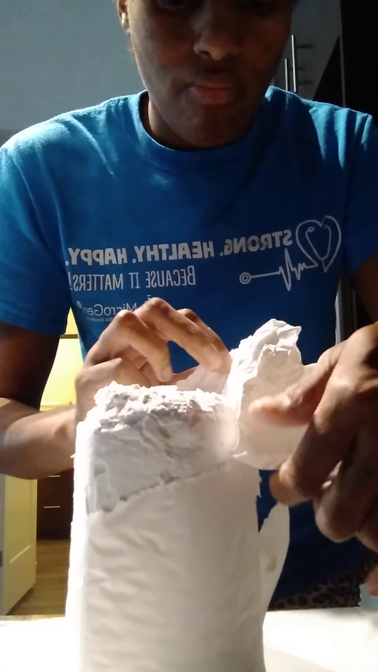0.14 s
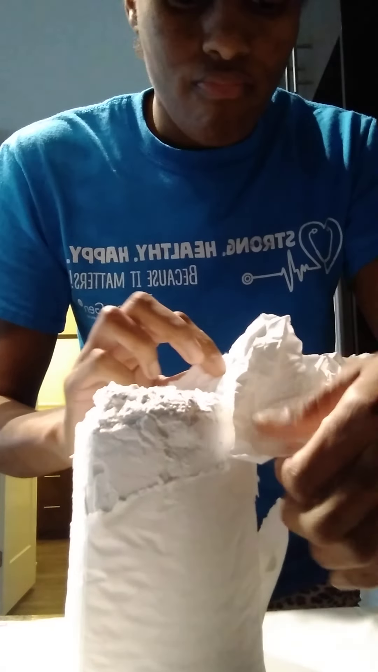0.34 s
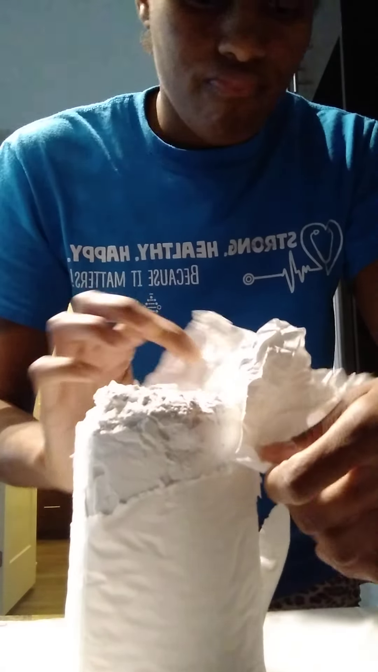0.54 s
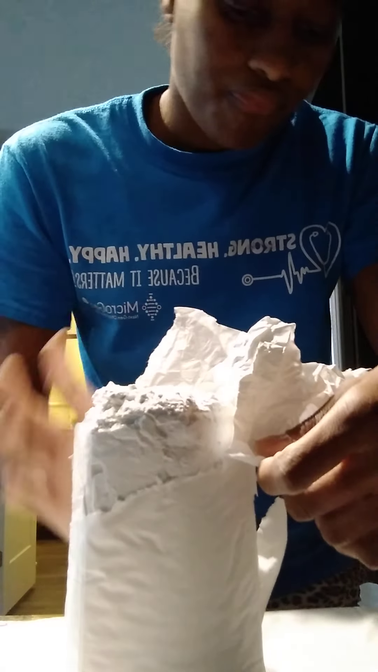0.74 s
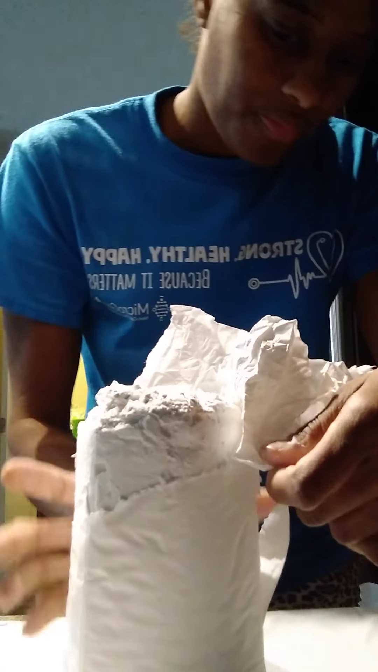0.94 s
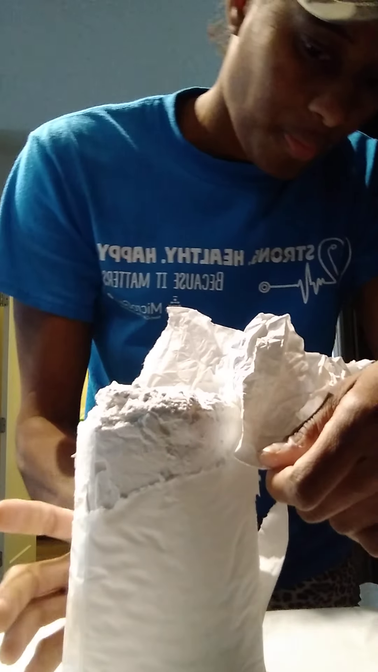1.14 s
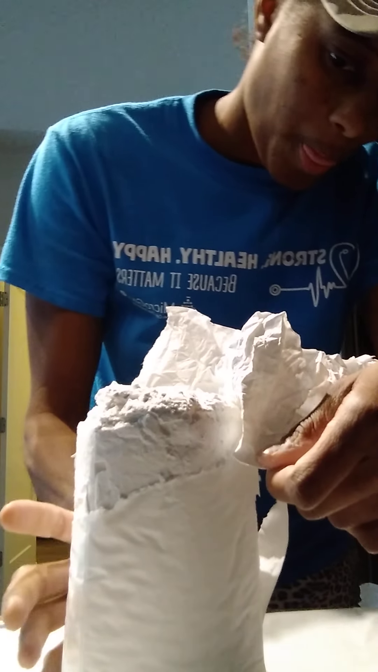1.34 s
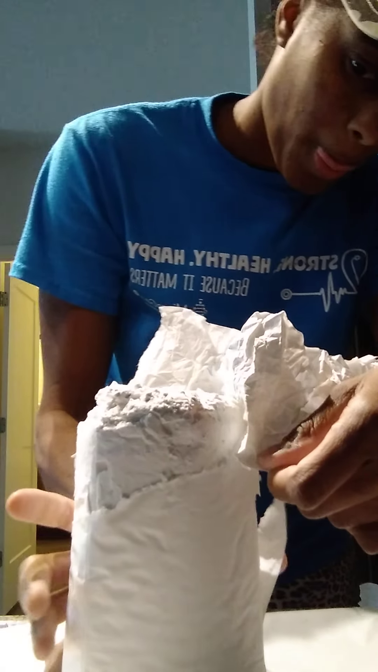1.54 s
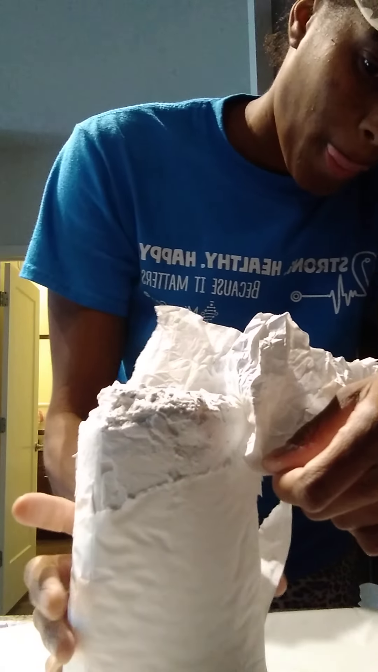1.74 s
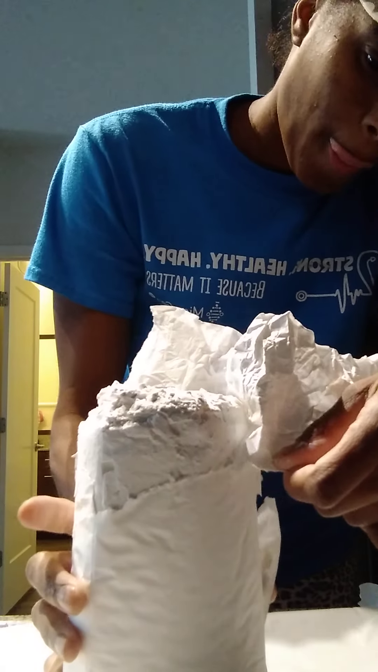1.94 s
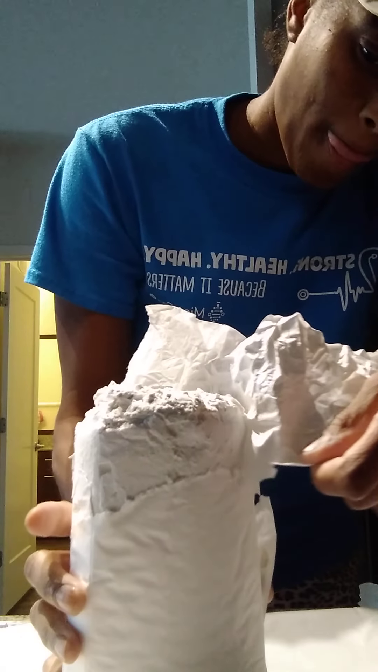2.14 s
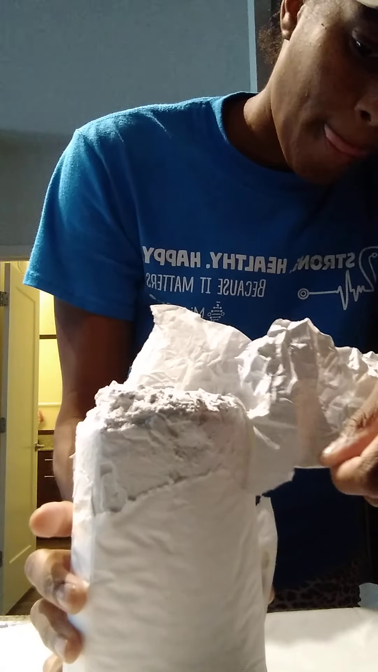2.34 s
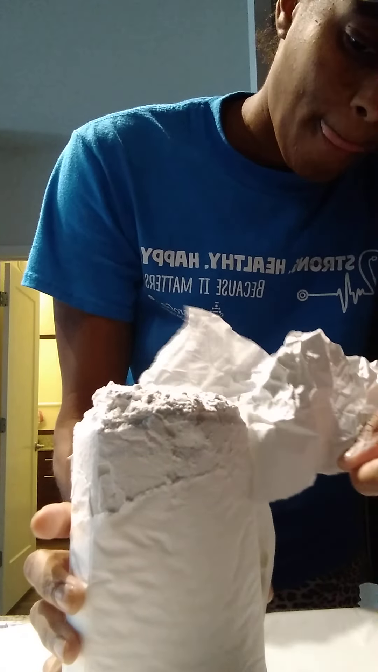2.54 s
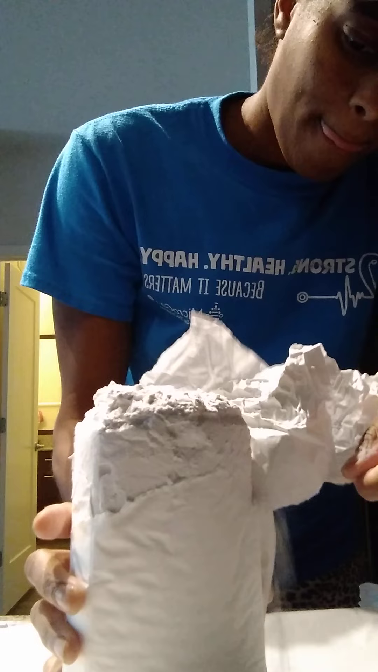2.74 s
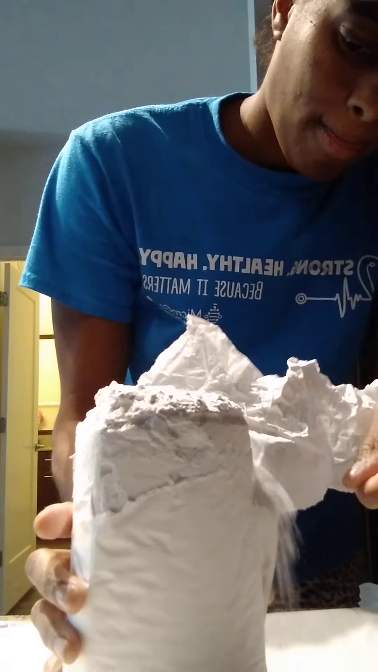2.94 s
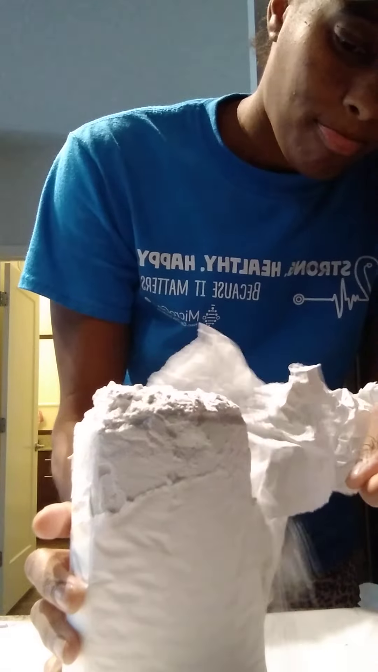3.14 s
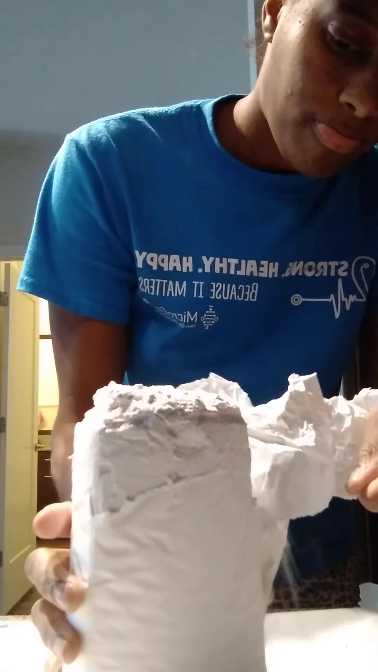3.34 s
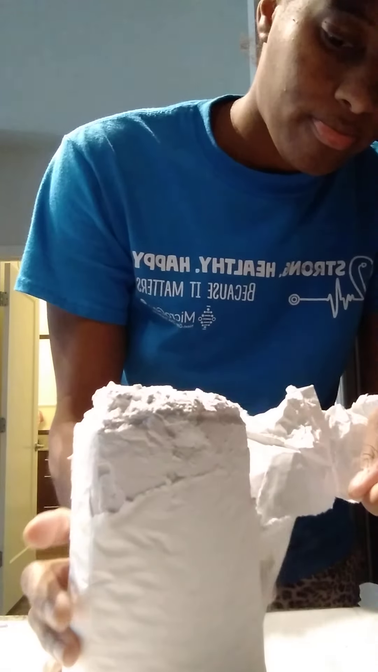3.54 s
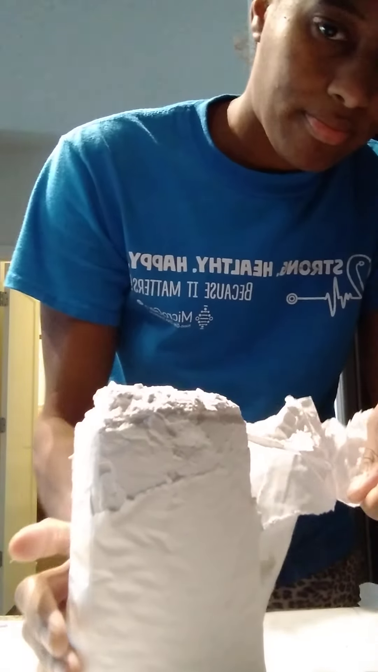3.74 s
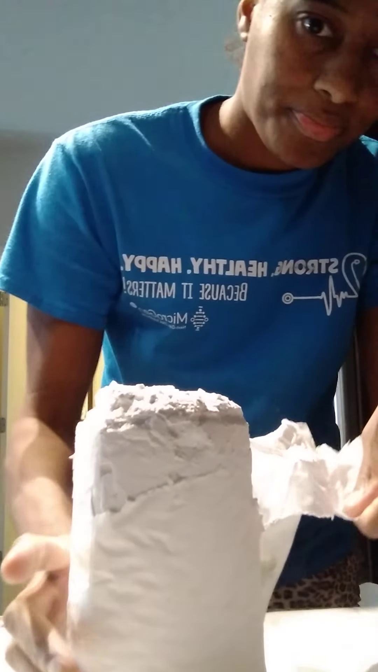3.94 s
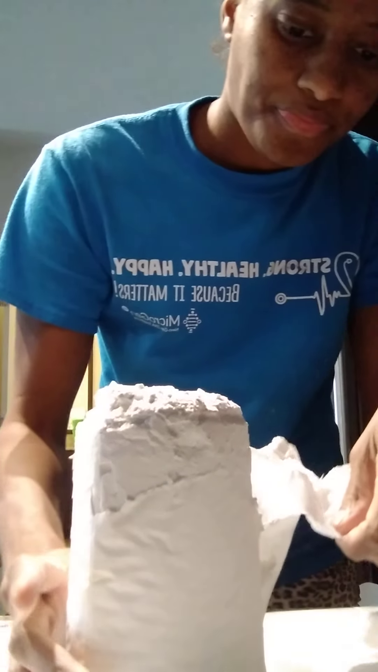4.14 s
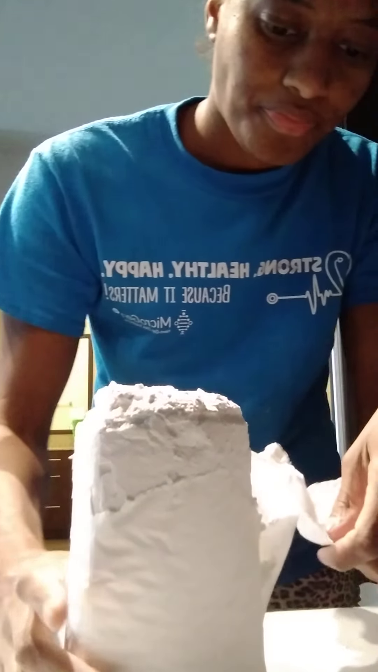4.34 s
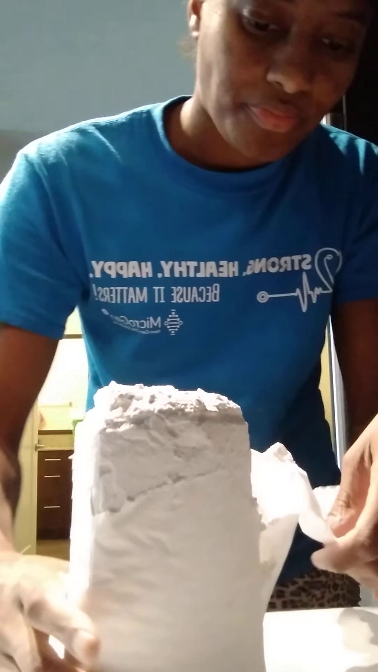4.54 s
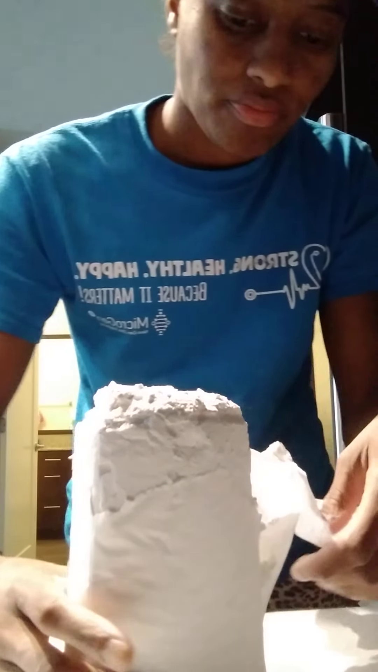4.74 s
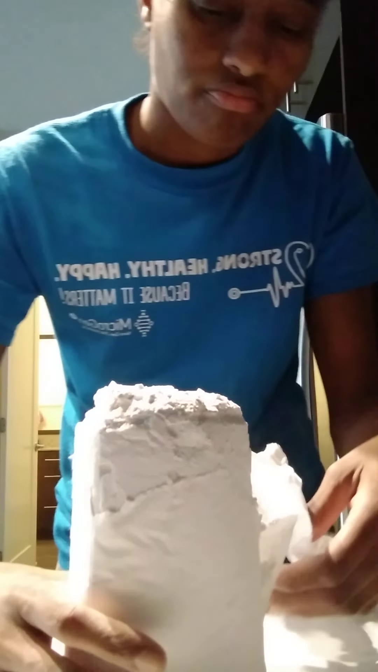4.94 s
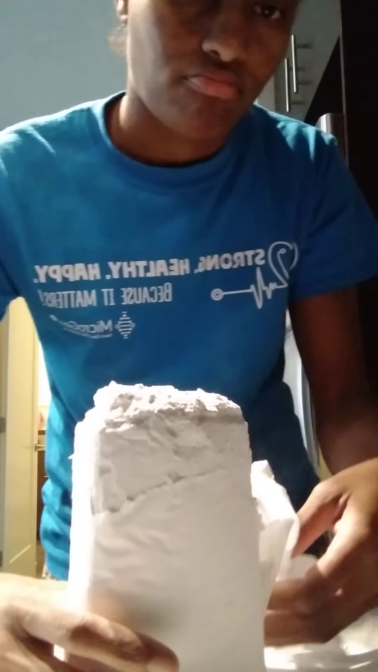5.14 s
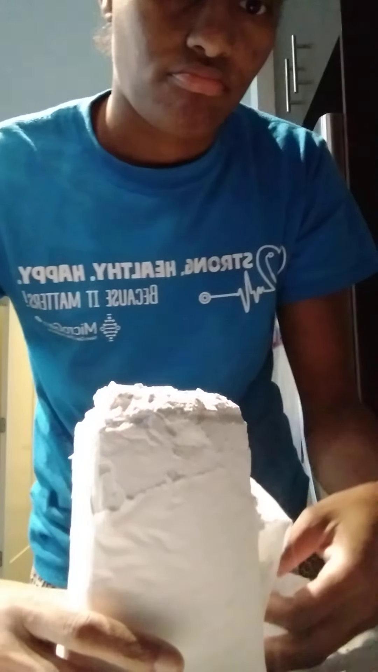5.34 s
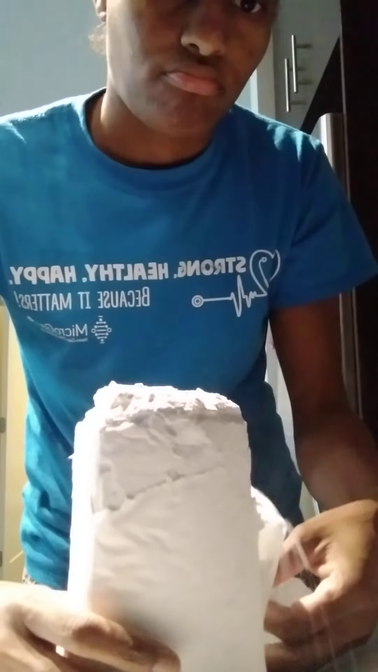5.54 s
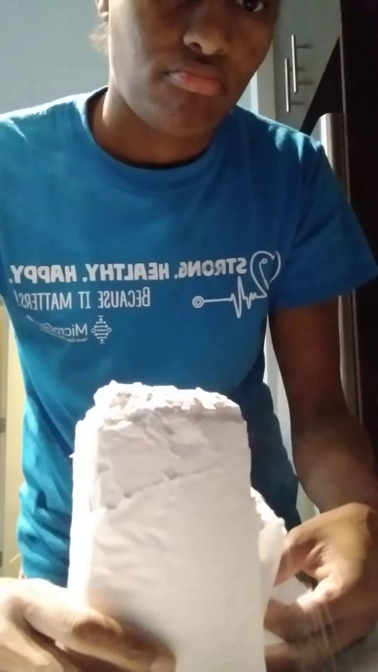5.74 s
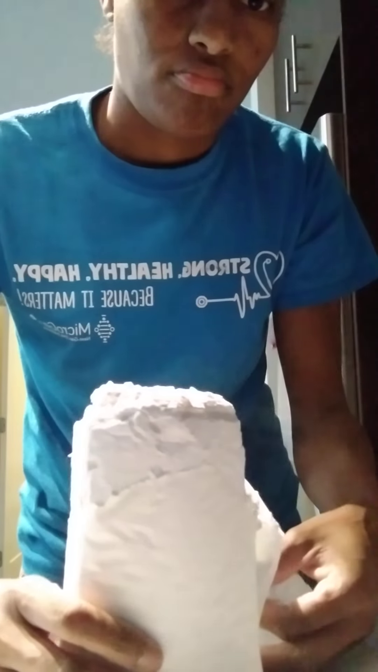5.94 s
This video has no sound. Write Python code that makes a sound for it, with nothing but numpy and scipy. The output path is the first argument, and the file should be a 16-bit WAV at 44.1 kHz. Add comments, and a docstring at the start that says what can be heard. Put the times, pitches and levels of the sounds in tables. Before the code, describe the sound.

A close, bright stereo phone pickup at arm's length in a small hard kitchen, with faint hiss, room air and mains hum. From 0 to 0.55 s stiff paper snaps loudly in irregular clicky bursts with rustling, strongest near 0.5. It then quiets; fingers swish softly over powder around 0.85-0.95. Small crinkles start near 1.3, with a very faint thin high tone, and sharper snaps from 1.55. From about 1.95 to 3.25 a dense, ragged tear crackles continuously, studded with hard snaps and short hollow fold rings, thinning at the end. Brief crinkles come at 3.5-3.6. From 3.9 only tiny knocks, faint fingertip drags of sliding pitch and dry powder hiss remain, with a snap and rub near 4.55, more around 4.9 and 5.2, a fuller rustle and snap at 5.43, and dull taps near 5.8-5.9. A barely audible low rumble lies beneath the later part.

```python
"""Sharp paper snaps at once, then a long crackling tear: hands peel a stiff paper towel off a baked starch block.
Creases are bursts of clicky noise, the tear a finer crackle, and hollow folds answer through short low resonances.
Soft knocks ring single air pockets, fingers hiss over powder, and a fingertip drags along folds of sliding pitch.
Recorded an arm's length away by a phone with two microphone ports on the counter of a small hard kitchen;
room air and mains hum lie behind, later a brief faint tone near 4 kHz and a low rumble."""
import sys
import numpy as np
from scipy import signal
from scipy.fft import rfft, irfft
from scipy.io import wavfile
from scipy.ndimage import uniform_filter1d

SR = 44100
rng = np.random.default_rng(int(sys.argv[2]) if len(sys.argv) > 2 else 0)


def inscribe(sig):
    """Save sig as 16-bit PCM at rate SR to the path in sys.argv[1].

    A 1-D sig is mono; a 2-D sig holds one channel per row.
    Samples are clipped to [-1, 1] before scaling.
    """
    pcm = np.round(np.clip(np.atleast_2d(sig).T, -1, 1) * 32767)
    wavfile.write(sys.argv[1], SR, pcm.astype(np.int16))


N = 264864

# spectrum of the room air and hiss: (frequency [Hz], relative level [dB])
AIR_SPECTRUM = [(25, -30.5), (60, -11.5), (130, -11), (260, -15), (500, -22.5), (1000, -29), (6000, -31.5),
                (16000, -37)]
# mains hum: (frequency [Hz], middle level before the waver [dB])
MAINS_HUM = [(59.5, -69), (120, -69)]
# creases that snap: (time [s], level [dB], fold ring against the snap [dB])
CREASE_SNAPS = [(0.017, 0, -14), (0.0494, -10, -15), (0.2181, -2, -17.5), (0.2473, -5, -42),
                (0.2946, 1, -28.5), (0.306, -8, -11.5), (0.371, -4, -27), (0.512, 0.5, -24),
                (0.517, 5, -31), (0.5387, -3, -21), (1.28, -29, -27), (1.312, -24.5, -36),
                (1.332, -17, -29), (1.4452, -17, -40), (1.4586, -10.5, -24), (1.5478, -2.5, -27.5),
                (1.577, -21, -11.5), (1.7396, -3.5, -36), (1.865, -11.5, -27), (1.8825, -3, -35),
                (1.9088, -13.5, -27), (1.923, -15.5, -20), (1.964, 2, -22.5), (2.0057, -3, -24.5),
                (2.028, -6, -30), (2.0972, -5.5, -37), (2.1595, -6, -40), (2.182, -5, -38),
                (2.197, -5.5, -31), (2.224, -6.5, -25.5), (2.256, -5, -29), (2.2961, -2.5, -32),
                (2.3333, 1, -23.5), (2.36, -7, -18.5), (2.4118, -6.5, -20), (2.4383, -5, -14),
                (2.4545, -10.5, -19), (2.468, -1.5, -30), (2.526, -8, -24), (2.544, -9.5, -26.5),
                (2.584, 0.5, -28.5), (2.6325, 2, -24), (2.702, -7, -28), (2.729, 5, -19.5),
                (2.822, -4, -20), (2.828, 2, -20.5), (2.8965, -14, -14), (2.914, -9, -28.5),
                (2.942, -13.5, -37), (2.979, -10.5, -30.5), (3.005, -14.5, -11), (3.0264, -6.5, -31.5),
                (3.037, -7, -25.5), (3.0528, -9, -13), (3.0742, -8, -12), (3.0845, -4.5, -25),
                (3.1008, -6.5, -7.5), (3.12, -5.5, -18.5), (3.134, -9.5, -21.5), (3.147, -9.5, -20),
                (3.2236, -3, -15.5), (3.465, -29, -6.5), (3.495, -12, -33.5), (3.536, -15, -17.5),
                (3.5662, -11, -12.5), (4.029, -29, -3.5), (4.088, -40.5, 5), (4.234, -31, -10.5),
                (4.539, -13, -20), (5.1956, -12.5, -23), (5.2054, -11.5, -18.5), (5.4252, -4, -26),
                (5.799, -23.5, -22)]
# short pulls that rustle the sheet: (peak time [s], rise [s], fall [s], fibre level [dB], fold level [dB])
SHEET_PULLS = [(0.016, 0.093, 0.13, -28.5, -42), (0.45, 0.25, 0.13, -34.5, -62),
               (0.52, 0.014, 0.086, -27.5, -50), (1.33, 0.064, 0.11, -41, -68), (1.6, 0.17, 0.13, -40, -74),
               (1.77, 0.044, 0.13, -36.5, -74), (3.47, 0.02, 0.19, -33, -55.5),
               (3.57, 0.02, 0.058, -32.5, -59), (3.7, 0.043, 0.51, -58.5, -82.5),
               (4.04, 0.064, 0.12, -56, -63.5), (4.55, 0.099, 0.18, -40.5, -59.5),
               (4.9, 0.36, 0.17, -54, -67), (5.202, 0.03, 0.067, -39, -51.5),
               (5.44, 0.15, 0.17, -27.5, -50.5), (5.79, 0.28, 0.066, -42, -56.5),
               (5.885, 0.12, 0.16, -45.5, -54.5)]
# the long tear: (time [s], fibre level [dB], fold level [dB])
LONG_TEAR = [(1.88, -47, -72), (1.95, -32, -71), (2.016, -15.5, -35.5), (2.24, -21, -47), (2.28, -28, -56),
             (2.48, -18, -33), (2.6, -24, -45), (2.66, -27, -43.5), (2.72, -21.5, -39), (2.86, -26, -41),
             (3.122, -22, -40), (3.208, -27.5, -42), (3.24, -26.5, -40), (3.354, -43.5, -78),
             (3.42, -59.5, -84)]
# colour of breaking fibres: (frequency [Hz], gain [dB])
FIBRE_COLOUR = [(300, -76), (1500, -20), (2000, -13), (2500, -18), (4500, -13.5), (6500, -8.5),
                (9000, -3.5), (12000, -9), (16000, -4.5)]
# resonances of the folds: (frequency [Hz], width [Hz], gain while taut and tearing [dB], gain while crumpled [dB])
FOLD_RINGS = [(165, 360, -7.5, -9.5), (297, 160, 4.5, -2), (456, 210, 8, 5.5), (748, 200, 7.5, 4),
              (1060, 850, 6.5, 4.5), (1560, 210, 2.5, 7.5), (1980, 170, 11, 15.5), (3050, 2700, 5, 1)]
# dull knocks of fingers, crumbs and flaps, each in one air pocket: (time [s], level [dB], centre [Hz])
POCKET_KNOCKS = [(0.217, -32, 2010), (0.514, -30.5, 470), (0.7, -60, 800), (0.906, -35.5, 2120),
                 (1.693, -45.5, 1520), (2.454, -27, 343), (2.456, -23.5, 784), (2.726, -28, 296),
                 (2.818, -29, 245), (2.835, -37, 89), (3.096, -29.5, 320), (3.22, -31.5, 520),
                 (3.389, -41, 740), (3.494, -41.5, 1570), (3.565, -34, 697), (4.03, -43, 2010),
                 (4.088, -52.5, 800), (4.236, -46.5, 744), (4.46, -48, 1710), (4.502, -51, 1400),
                 (4.538, -43.5, 1460), (4.608, -50, 1770), (4.691, -52.5, 1600), (4.773, -52.5, 1610),
                 (4.865, -52, 1510), (4.915, -50, 1520), (4.956, -47.5, 754), (4.975, -51, 2080),
                 (5.02, -48, 1940), (5.175, -47, 1950), (5.197, -40.5, 1220), (5.324, -43, 1550),
                 (5.338, -42.5, 1940), (5.426, -46, 2040), (5.452, -42, 1900), (5.454, -41.5, 660),
                 (5.647, -39, 1920), (5.762, -45, 1640), (5.804, -41, 1660), (5.878, -34, 1780),
                 (5.888, -37.5, 850)]
# fingers slide over powder: (time at full [s], rise [s], fall [s], level [dB], hold [s])
FINGER_STROKES = [(0.84, 0.038, 0.052, -38, 0.041), (0.91, 0.024, .11, -33, 0.032),
                  (4.165, 0.017, 0.027, -43.5, 0.015), (4.25, 0.043, 0.12, -48, 0.039),
                  (4.55, 0.02, 0.16, -37, 0.021), (4.87, 0.051, 0.098, -33.5, 0.099),
                  (5.1, 0.11, 0.087, -56.5, 0.057), (5.43, 0.29, 0.1, -29.5, 0.099)]
# colour of the powder hiss: (frequency [Hz], gain [dB])
POWDER_COLOUR = [(300, -48), (1500, -15), (3200, -21.5), (4500, -22.5), (6000, -13), (9500, -2),
                 (12000, -5), (16000, -5)]
# faint, thin, steady-pitched tone: (time at full [s], rise [s], fall [s], level [dB], hold [s])
FAINT_TONE = [(1.29, 0.087, .1, -67, 0.028)]
# low rumble that sets in: (time [s], level [dB])
LOW_RUMBLE = [(2.3, -92), (3, -65), (6.1, -76)]
# a fingertip drags along a fold: (time at full [s], rise [s], fall [s], level [dB], hold [s])
FINGERTIP_DRAGS = [(3.9, 0.033, 0.068, -61.5, 0.11), (5.18, 0.038, .04, -55.5, 0.055),
                   (5.33, 0.08, 0.037, -58, 0.122)]
# sliding pitch of the dragged pocket: (time [s], frequency [Hz])
DRAG_PITCH = [(3.879, 799), (3.951, 1396), (5.15, 480), (5.3, 625), (5.42, 503)]
# place of the hands as they work round: (time [s], left minus right [dB])
HAND_PLACE = [(0, 0.5), (2, 2.5), (4.2, 1.4), (6, -0.5)]
# treble resonances of each microphone port: (frequency [Hz], gain [dB])
LEFT_PORT = [(300, -11), (1300, -2), (2500, -4), (6500, 2.5), (8200, 6.5), (9500, -0.5), (14800, 2),
             (16000, -1.5)]
RIGHT_PORT = [(300, -11.5), (1300, -5.5), (2500, -4.5), (6500, 4.5), (8200, 2.5), (9400, 13), (10800, 3),
              (13000, -1.5), (16000, -17.5)]

ALIKE_HZ = 1100  # below about this both ports hear the same wave
PULL_LAW, STROKE_LAW = 1.44, 1.35  # shape of a swell: 1 = pointed, 2 = rounded
SNAP_RISE_S, SNAP_HOLD_S = 0.0023, 0.002
SNAP_FADE_S, FADE_S_PER_DB = 0.034, 0.0016  # bigger creases crackle on for longer
SNAP_CORE = 0.28  # share of a snap that breaks in one piece
CREST_DB = 12.5  # allowance for noise peaks above their envelope
KNOCK_HZ, KNOCK_RISE_S, KNOCK_FADE_S = 700, 0.007, 0.072  # a middling pocket
KNOCK_WIDTH = 0.43  # resonance width as a share of its pitch


def undb(db):
    """Decibels to amplitude."""
    return 10 ** (np.asarray(db) / 20)


def unit(x):
    """Scale to an rms of 1."""
    return x / np.sqrt(np.mean(x ** 2))


def colour(x, table, size=4096):
    """Causal filter through (Hz, dB) points, from the folded cepstrum of the log gain."""
    hz, db = np.transpose(table)
    grid = np.maximum(np.arange(size // 2 + 1) * SR / size, 1)
    log_gain = np.log(undb(np.interp(np.log(grid), np.log(hz), db)))
    cepstrum = irfft(log_gain, size)
    cepstrum[1:size // 2] *= 2
    cepstrum[size // 2 + 1:] = 0
    taps = irfft(np.exp(rfft(cepstrum)), size)[:size // 2]
    return signal.oaconvolve(x, taps[None], axes=1)[:, :N]


def butter(x, order, hz, kind="low"):
    """Butterworth filter."""
    return signal.sosfilt(signal.butter(order, hz, kind, fs=SR, output="sos"), x)


def band(x, hz, width_hz):
    """One resonance."""
    return signal.lfilter(*signal.iirpeak(hz, hz / width_hz, SR), x)


def double_band(x, hz, width_hz):
    """The same resonance twice, for steeper sides."""
    return band(band(x, hz, width_hz), hz, width_hz)


def held(count, size):
    """Random levels, each held for `size` samples and joined softly."""
    steps = np.repeat(rng.standard_normal(count // size + 1), size)[:count]
    return uniform_filter1d(steps, size // 2)


def pair(share=0., lag=0.):
    """Noise at two ports: one wave in the bass, a share of common treble with a wandering lag in samples."""
    shared, own = rng.standard_normal(N), rng.standard_normal((2, N))
    shift = np.round(lag * held(N, size=2048)).astype(int)
    late = shared[np.clip(np.arange(N) + shift, 0, N - 1)]
    treble = np.sqrt(share) * np.array([shared, late]) + np.sqrt(1 - share) * own
    return treble + butter(shared - treble, 2, ALIKE_HZ)


def grain(spread_db, per_s, fade_s):
    """Envelope of random clicks, a few far larger than the rest, each dying fast; rms near 1."""
    hit = rng.random(N) < per_s / SR
    size = np.minimum(rng.exponential(size=N), 4)
    power = signal.lfilter([1], [1, -np.exp(-1 / (fade_s * SR))], hit * undb(2 * spread_db * size))
    return np.sqrt(power / (uniform_filter1d(power, SR // 8) + 1e-12))


def burst(s, fade_s, rise_s, hold_s=0.):
    """Start index and envelope of one burst that swells, may hold, then loses 60 dB in fade_s (5 ms or more)."""
    t = np.arange(SR // 4) / SR
    start = max(int((s - rise_s) * SR), 0)
    rise = np.minimum(t / rise_s, 1) ** 2
    fade = undb(-60 * np.maximum(t - rise_s - hold_s, 0) / max(fade_s, .005))
    return start, (rise * fade)[:N - start]


def track(rows, column=1):
    """One dB column of a curve as gain, lightly smoothed; silent outside the curve."""
    rows = np.array(rows)
    db = np.interp(np.arange(N) / SR, rows[:, 0], rows[:, column], left=-200, right=-200)
    return uniform_filter1d(undb(db), SR // 200)


def swells(rows, law, column=3, hold=None):
    """Gain of gestures that swell to a peak, may hold it, and die away."""
    out, t = np.zeros(N), np.arange(N) / SR
    for row in rows:
        end = row[0] + (max(row[hold], 0) if hold else 0)
        away = np.maximum(np.maximum((row[0] - t) / row[1], (t - end) / row[2]), 0)
        out += undb(row[column] - 20 * np.minimum(away, 9) ** law)  # 20 dB down one rise or fall away
    return out


def room_air():
    """Room air and microphone hiss: coloured noise with a slightly wandering level."""
    return undb(-65.5) * unit(colour(pair() * undb(1.5 * held(N, size=2048)), AIR_SPECTRUM))


def mains_hum():
    """Mains hum: low sines whose levels waver separately."""
    t = np.arange(N) / SR
    return sum(np.sqrt(2) * undb(db + 3.3 * held(N, size=4096)) * np.sin(2 * np.pi * hz * t)
               for hz, db in MAINS_HUM)


def fibres(x, scatter_db):
    """Coarse and fine fibres come and go around the middling ones, so the brightness flickers."""
    coarse, below_fine = butter(x, 2, 6000), butter(x, 2, 11000)
    ends = sum(part * undb(scatter_db * held(N, size=512)) for part in (coarse, x - below_fine))
    return colour(ends + below_fine - coarse, FIBRE_COLOUR)


def folds(x, scatter_db, taut=False):
    """Air pockets and panels of the crumpled sheet ring briefly; the sheet moves, so each ring comes and goes."""
    out = 0
    for hz, width_hz, taut_db, slack_db in FOLD_RINGS:
        db = np.where(taut, taut_db, slack_db) + scatter_db * held(x.shape[1], size=1024)
        out = out + band(x * undb(db), hz, width_hz)
    return out


def snaps():
    """Breaking creases: short bursts, part solid and part ragged clicks; returns drive for fibres and folds."""
    bright, dull = np.zeros(N), np.zeros(N)
    ragged = grain(2.2, 900, .0004)
    for s, db, fold_db in CREASE_SNAPS:
        i, shape = burst(s, SNAP_FADE_S + FADE_S_PER_DB * db, SNAP_RISE_S, SNAP_HOLD_S)
        torn = shape * (SNAP_CORE + (1 - SNAP_CORE) * ragged[i:i + len(shape)])
        snap = unit(torn) * np.sqrt(np.mean(shape ** 2)) * undb(db - CREST_DB)
        bright[i:i + len(snap)] += snap
        dull[i:i + len(snap)] += snap * undb(fold_db)
    return bright, dull


def crackle():
    """Tear and pulls: dense clumped clicks drive the fibres, sparser ones the folds, which give way less often."""
    fine = (track(LONG_TEAR) + swells(SHEET_PULLS, PULL_LAW)) * grain(2.1, 800, .001)
    fine *= undb(0.89 * held(N, size=400))  # fibres give way in clumps
    dull = track(LONG_TEAR, column=2) + swells(SHEET_PULLS, PULL_LAW, column=4)
    return fine, dull * grain(1.2, 190, 0.0041)


def paper():
    """Snaps and running crackle shape noise that drives the bright fibres and the lower folds."""
    bright, snap_dull = snaps()
    fine, crackle_dull = crackle()
    noise = pair(0.9, 6.)
    rustle = butter(fine * noise, 2, 4500, "high")  # the running crackle is thin in the bass
    fold_drive = (snap_dull + crackle_dull) * pair(0.77, 6.)
    taut = track(LONG_TEAR) > 1e-4
    return fibres(bright * noise + rustle, scatter_db=3) + folds(fold_drive, 3.95, taut)


def kitchen(x, t60_s=0.28, near_t60_s=0.091, far_db=-11, near_db=-7):
    """Counter and block reflect at once; the walls give a longer tail, both as fading noise."""
    t = np.arange(SR // 2) / SR
    near = unit(pair()[:, :len(t)] * undb(-60 * t / near_t60_s))
    far = unit(pair()[:, :len(t)] * undb(-60 * t / t60_s) * (t > .006))
    far = butter(far, 1, 3000, "high")  # the lower folds are heard nearly dry
    taps = (undb(near_db) * near + undb(far_db) * far) / np.sqrt(len(t))
    return x + signal.oaconvolve(x, taps, axes=1)[:, :N]


def knocks():
    """Soft short pushes, each ringing one pocket and, weakly, all folds."""
    out, push = np.zeros((2, N)), pair(0.21, 2.7)
    for s, db, hz in POCKET_KNOCKS:
        slow = (KNOCK_HZ / hz) ** 0.15  # larger pockets are slower
        spill = 0.68 * min(hz / KNOCK_HZ, 1) ** 5  # and stir the folds less
        i, shape = burst(s, KNOCK_FADE_S * slow, KNOCK_RISE_S * slow)
        part = shape * push[:, i:i + len(shape)]
        ring = unit(double_band(part, hz, KNOCK_WIDTH * hz)) + spill * unit(folds(part, 3.0))
        out[:, i:i + len(shape)] += undb(db) * ring * np.sqrt(np.mean(shape ** 2) / 2)
    return out


def strokes():
    """Skin on fine powder: a soft, very dense, bright hiss."""
    gain = swells(FINGER_STROKES, STROKE_LAW, hold=-1)
    return colour(gain * grain(1.0, 4500, 0.00073) * pair(0.17, 2.9), POWDER_COLOUR)


def faint_tone():
    """A faint, thin tone of steady pitch near 4 kHz: one sine with a flickering level."""
    gain = np.sqrt(2) * swells(FAINT_TONE, STROKE_LAW, hold=-1) * undb(4 * held(N, size=512))
    return gain * np.sin(2 * np.pi * 3975 * np.arange(N) / SR)


def rumble():
    """A low rumble: noise in a narrow band around 52 Hz."""
    return track(LOW_RUMBLE) * unit(double_band(pair(), 52, 40))


def drag():
    """Soft friction in a pocket whose pitch slides as it closes or opens, under a second, steady resonance."""
    hz = np.interp(np.arange(N) / SR, *np.transpose(DRAG_PITCH))
    waver = unit(butter(rng.standard_normal(N), 2, 115))
    sliding = waver * np.sin(2 * np.pi * np.cumsum(hz) / SR)
    steady = unit(double_band(pair(0.49), 1910, 230))
    return swells(FINGERTIP_DRAGS, STROKE_LAW, hold=-1) * (sliding + 0.8 * steady)


def scene():
    """The hands move slightly across the stereo picture in the kitchen, over its background."""
    pan_db = np.interp(np.arange(N) / SR, *np.transpose(HAND_PLACE))
    hands = (paper() + knocks() + strokes() + drag()) * undb(np.array([pan_db, -pan_db]) / 2)
    return kitchen(hands) + room_air() + mains_hum() + faint_tone() + rumble()


def record(dry):
    """Two microphone ports colour the sound, the loudest peaks round off, the top is cut."""
    dry = butter(dry, 1, 35, "high")
    ports = np.vstack([colour(dry[:1], LEFT_PORT), colour(dry[1:], RIGHT_PORT)])
    rounded = np.tanh(0.86 * ports) / 0.74
    return signal.sosfilt(signal.ellip(10, .2, 70, 15900, fs=SR, output="sos"), rounded)


dry = scene()
out = record(dry)
inscribe(out)
```